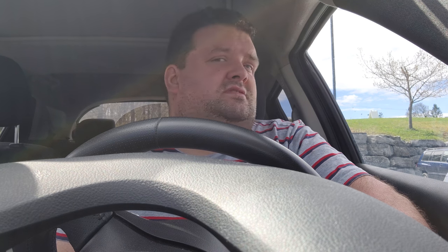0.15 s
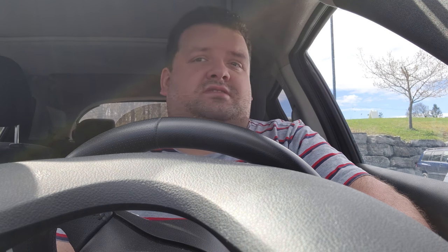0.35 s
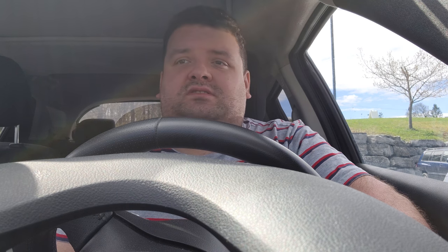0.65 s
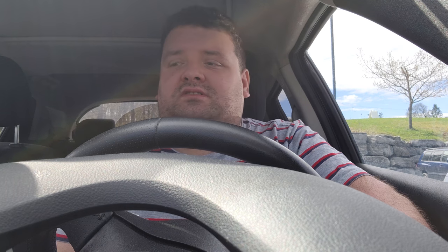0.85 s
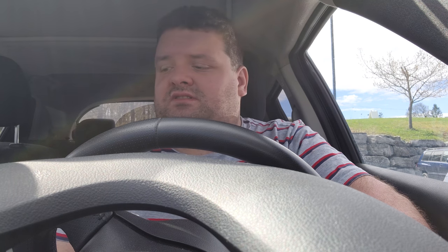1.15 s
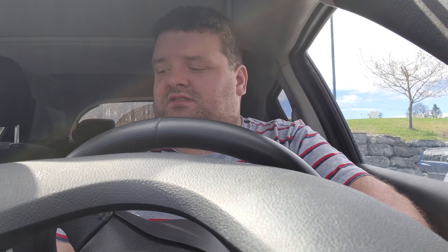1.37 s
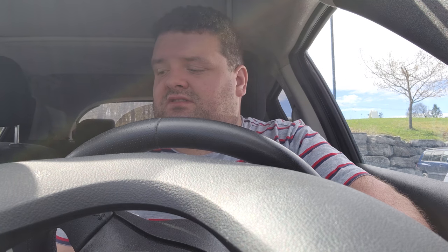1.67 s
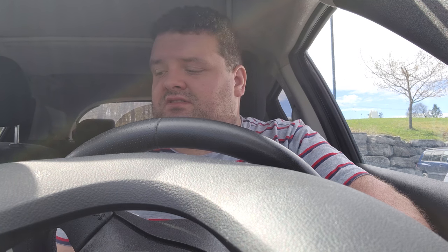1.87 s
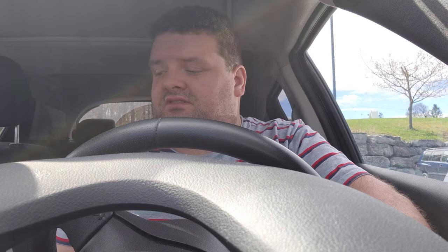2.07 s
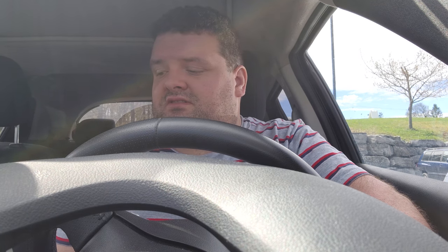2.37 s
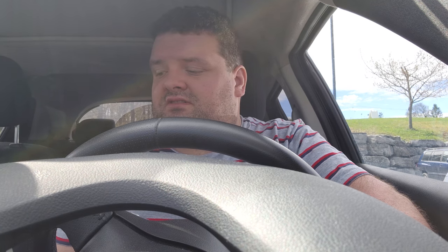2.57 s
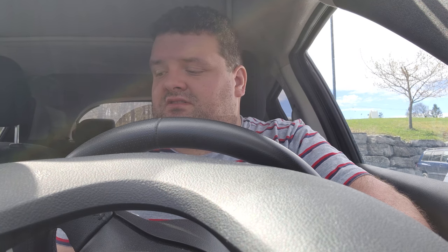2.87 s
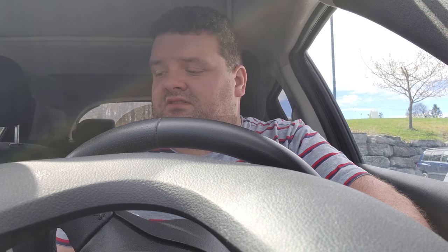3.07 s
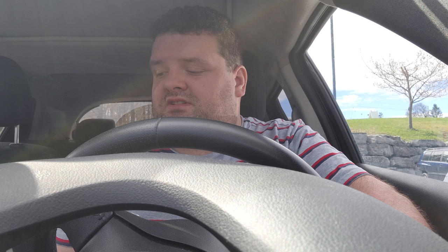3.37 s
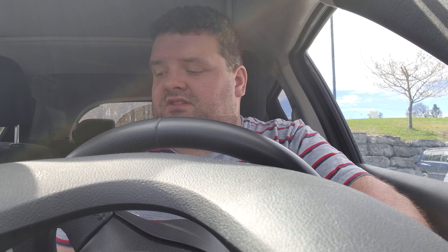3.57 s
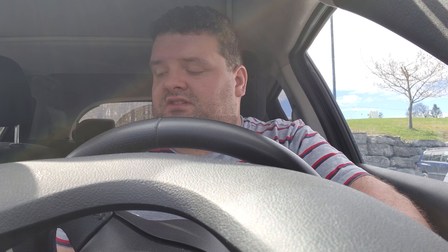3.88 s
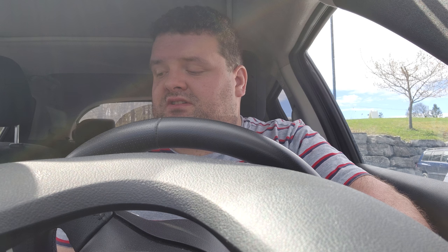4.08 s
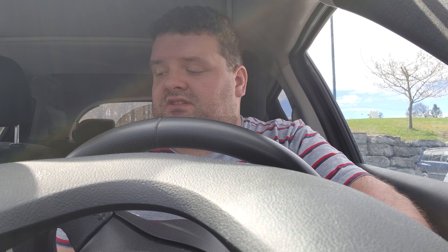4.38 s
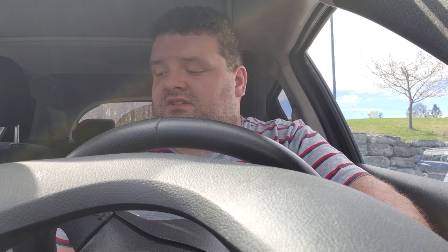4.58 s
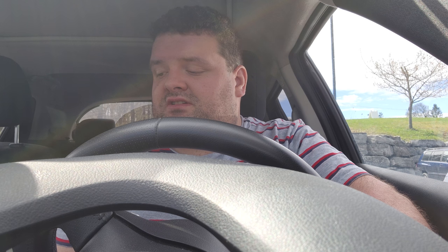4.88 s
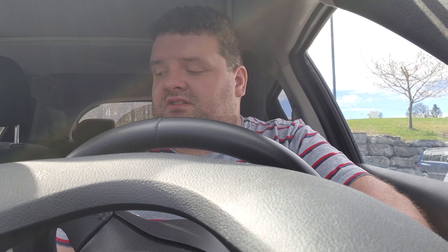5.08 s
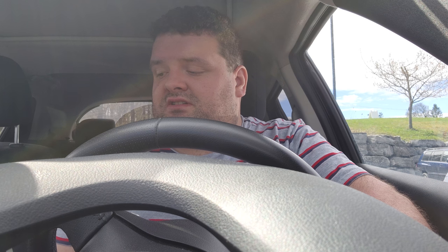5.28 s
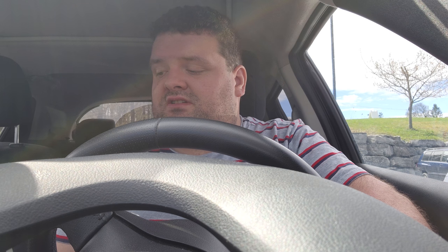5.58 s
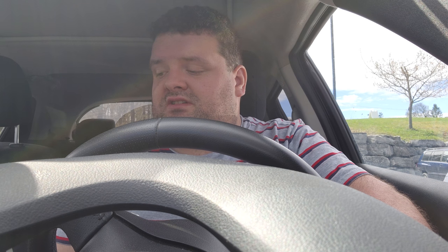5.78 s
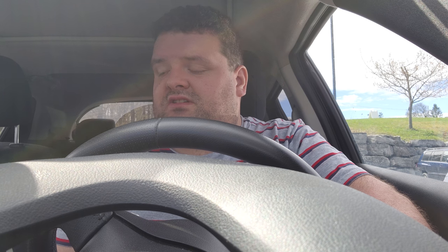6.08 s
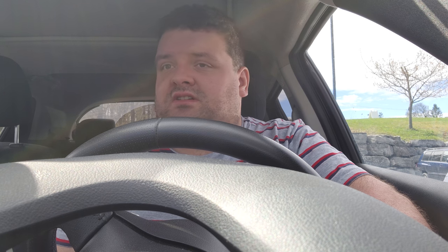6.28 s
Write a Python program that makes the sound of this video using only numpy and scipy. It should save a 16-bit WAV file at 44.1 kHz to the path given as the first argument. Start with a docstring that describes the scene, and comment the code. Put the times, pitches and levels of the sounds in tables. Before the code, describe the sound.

A steady rush of air blows from a car's vents, heard very close in the cabin, with small gusts thumping and fluttering on the microphone. Beneath it sit the low hum of the idling engine and a faint fan whine. Late on comes one short plastic click from the fan knob; the whine then sinks and the airflow grows quieter and loses its hiss.

```python
"""Air conditioning rushes from the dashboard vents of a parked car, close beside the microphone.
The air sets the dashboard's hollows humming and its draught buffets the two microphone ports.
The blower whines faintly and the engine idles. A sleeve brushes the seat and the trim squeaks.
The fan knob clicks down one step; shortly afterwards the blower slows and the rush grows soft and dull."""
import sys
import numpy as np
from scipy import signal
from scipy.fft import rfft, irfft
from scipy.io import wavfile
from scipy.ndimage import uniform_filter1d

SR = 44100
rng = np.random.default_rng(int(sys.argv[2]) if len(sys.argv) > 2 else 0)


def unload_audio(sound):
    """Save the sound as a 16-bit wav file, at the path given as the first command line argument."""
    columns = np.transpose(np.atleast_2d(sound))
    # keep every value between -1 and 1, then stretch to whole-number steps
    steps = np.round(np.clip(columns, -1, 1) * 32767)
    wavfile.write(sys.argv[1], SR, steps.astype(np.int16))


N = 284048
TIME_S = np.arange(N) / SR
BINS_HZ = np.maximum(np.arange(N // 2 + 1) * SR / N, 1)


def from_db(db):
    """Decibels to gain."""
    return 10 ** (np.asarray(db) / 20)


def over_time(rows):
    """A curve's columns at every sample."""
    times_s, *columns = np.transpose(rows)
    return [np.interp(TIME_S, times_s, column) for column in columns]


def over_frequency(rows):
    """A spectrum's columns at every bin."""
    hz, *columns = np.transpose(rows)
    return [np.interp(np.log(BINS_HZ), np.log(hz), column) for column in columns]


def white_spectrum():
    """Spectrum of fresh white noise."""
    return rfft(rng.standard_normal(N))


def noise(colour):
    """Coloured noise, rms 1."""
    x = irfft(white_spectrum() * colour, N)
    return x / np.sqrt(np.mean(x ** 2) + 1e-20)


def stereo_noise(colour, coherence):
    """Coloured noise, partly shared by the two ports."""
    shared = np.sqrt(coherence) * noise(colour)
    return shared + np.sqrt(1 - coherence) * np.array([noise(colour), noise(colour)])


def resonance(hz, half_width_hz):
    """Spectral peak of height 1."""
    return 1 / (1 + ((BINS_HZ - hz) / half_width_hz) ** 2)


def drift(rate_hz):
    """Random wander, rms 1."""
    return noise(resonance(0, rate_hz))


def swell(peak_s, length_s):
    """Smooth bump of height 1."""
    return np.exp(-(2 * (TIME_S - peak_s) / length_s) ** 2)


def tone(hz):
    """Sine on a pitch curve, rms 1."""
    return np.sqrt(2) * np.sin(2 * np.pi * np.cumsum(hz) / SR)


def pan(balance_db):
    """Constant-power gains; balance is left over right."""
    gains = from_db(np.array([[.5], [-.5]]) * balance_db)
    return gains / np.sqrt(np.mean(gains ** 2, axis=0))


def microphone_hiss(level_db):
    """The microphone's own white noise."""
    return from_db(level_db) * stereo_noise(1, coherence=.05)


# Each row: time in seconds, firing rate in Hz.
FIRING_RATE = [(0, 23.3), (1.2, 22.9), (2.0, 23.0), (2.3, 25.2), (3.0, 24.4), (3.9, 23.4), (4.3, 23.6),
               (4.6, 24.3), (5.5, 23.5), (5.9, 23.7), (6.44, 23.0)]
# Each entry: a multiple of the firing rate.
ENGINE_ORDERS = [1, 2, 5, 6]
# Each row: one order's level in dB, its share of the hum's swing.
ORDER_LEVELS = [(-56, 0), (-44.5, 0), (-47, 0.97), (-56, 1)]
# Each row: time in seconds, swing of the hum in dB.
HUM_SWING = [(0, 0.5), (2.05, 3), (2.4, -8.5), (3.35, -7.5), (3.7, 0.5), (4.4, 0), (5.0, -12), (5.35, -1.5),
             (6.44, 0)]


def engine(waver_db, rate_wander, balance_db):
    """The idle drones on multiples of the firing rate; the upper ones come and go in the cabin."""
    firing_hz = over_time(FIRING_RATE)[0] * (1 + rate_wander * drift(3))
    swing_db, = over_time(HUM_SWING)
    drone = sum(from_db(db + share * swing_db + waver_db * drift(5.1)) * tone(order * firing_hz)
                for order, (db, share) in zip(ENGINE_ORDERS, ORDER_LEVELS))
    return drone * pan(balance_db)


# Each row: time in seconds, blade-passing rate in Hz.
BLADE_RATE = [(0.2, 842), (0.8, 835), (1.5, 835.5), (2.6, 840.3), (4.1, 838.7), (5.78, 840), (5.88, 808),
              (6.0, 738), (6.1, 692), (6.2, 662), (6.44, 620)]
# Each row: time in seconds, full-speed level of the blade tone in dB.
BLADE_LEVEL = [(0, -63.5), (3.0, -64.5), (4.8, -67.5), (5.8, -65.5)]


def blower_whine(speed, jitter_hz, waver_db, db_per_speed):
    """The blade tone follows the blower's speed and wavers in the air stream."""
    level_db = over_time(BLADE_LEVEL)[0] + db_per_speed * (speed - 1) + waver_db * drift(4.4)
    return from_db(level_db) * tone(over_time(BLADE_RATE)[0] + jitter_hz * drift(21))


def blower_speed():
    """Share of full speed; falls as the blower coasts down."""
    return over_time(BLADE_RATE)[0] / BLADE_RATE[0][1]


# Each row: frequency in Hz, relative density of the rustle in dB.
CLOTH_SPECTRUM = [(300, -25), (2000, -2), (4500, 6), (7000, 2), (9000, -4), (10500, -5.5), (15000, -8)]
# Each row: peak in seconds, rise in seconds, release in seconds, level in dB.
SLEEVE_STROKES = [(.22, .4, 0.36, -84), (.69, 0.18, 0.33, -85.5), (1.5, .42, .13, -74),
                  (2.33, .65, .6, -82), (5.79, 0.13, .14, -81)]


def sleeve(grain_db, fade_db):
    """Threads slip over the seat in soft swishes; each rise and release spans fade_db."""
    envelope = sum(from_db(db - fade_db * np.maximum((peak_s - TIME_S) / rise_s,
                                                     (TIME_S - peak_s) / release_s))
                   for peak_s, rise_s, release_s, db in SLEEVE_STROKES)
    grain = from_db(grain_db * drift(300))
    return envelope * grain * stereo_noise(from_db(over_frequency(CLOTH_SPECTRUM)[0]), coherence=0.27)


# Each row: peak in seconds, length in seconds, level in dB.
TRIM_SQUEAKS = [(1.921, .012, -68.5), (1.935, .04, -72.5)]


def trim_squeaks(pitch_hz, half_width_hz):
    """Plastic trim squeaks as the arm leans on it."""
    envelope = sum(from_db(db) * swell(peak_s, length_s) for peak_s, length_s, db in TRIM_SQUEAKS)
    return envelope * stereo_noise(resonance(pitch_hz, half_width_hz), coherence=0.91)


# Each row: frequency in Hz, relative density of the scattered snap in dB.
SNAP_SPECTRUM = [(600, -15), (1400, -3), (2000, -9), (2400, -6), (3000, -5), (4300, 2.5), (5600, -3.5),
                 (6800, -8), (8200, -16), (9800, -17), (11000, -11.5), (13000, -15), (16000, -10)]
# Each row: frequency in Hz, relative level in dB, T60 in seconds.
PLASTIC_MODES = [(1497, -10, .08), (2220, -11, .07), (2310, -10, .05), (2385, -10, .05), (2982, -8.5, .07),
                 (3739, -12, .06), (4099, -5.5, .045), (4240, -6, .04), (4440, -12, .05), (4672, -9, .065),
                 (5103, -15, .06), (5371, -10, .04), (5522, -9.5, .04), (5667, -10, .04), (5981, -13, .04),
                 (6772, -16, .06), (8113, -21, .05), (10650, -17, .025), (11300, -15, .02)]
# Each row: start in seconds, gain in dB, balance in dB, low-pass cutoff in Hz, attack in seconds.
KNOB_TICKS = [(5.405, -39, 4, 5500, 0.0064), (5.4134, -33.5, 6, 10000, 0.0021),
              (5.4167, -27.5, 0.5, 11900, 0.00052), (5.4221, -33, 2.5, 14100, 0.00062),
              (5.429, -41, 2, 8000, .0006), (5.4423, -41, -3, 8000, 0.0011),
              (5.4474, -45, 0.5, 11000, 0.0011), (5.480, -45.5, -1, 4200, 0.0016),
              (5.787, -61, -2, 10500, .004), (5.855, -57, -7, 10500, 0.0027)]


def fan_knob(snap_db, snap_t60_s, tail_db, tail_t60_s, ring_db):
    """A soft lead-in, sharp clicks, then faint ticks as the finger lets go; each rings and dies away."""
    out = np.zeros((2, N))
    scatter = stereo_noise(from_db(over_frequency(SNAP_SPECTRUM)[0]), coherence=0.062)
    age_s = TIME_S[:SR // 4]
    decay = from_db(snap_db - 60 * age_s / snap_t60_s) + from_db(tail_db - 60 * age_s / tail_t60_s)
    for start_s, db, balance_db, cutoff_hz, attack_s in KNOB_TICKS:
        start = round(start_s * SR)
        span = slice(start, start + len(age_s))
        ring = sum(from_db(ring_db + mode_db - 60 * age_s / t60_s)
                   * np.sin(2 * np.pi * (hz * age_s + rng.random((2, 1))))
                   for hz, mode_db, t60_s in PLASTIC_MODES)
        tick = (scatter[:, span] * decay + ring) * np.minimum(age_s / attack_s, 1)
        lowpass = signal.butter(2, cutoff_hz, fs=SR, output="sos")
        out[:, span] += from_db(db) * pan(balance_db) * signal.sosfilt(lowpass, tick)
    return out


# Each row: frequency in Hz, half-width in Hz, full-speed level in dB.
HOLLOW_MODES = [(144, 5, -57.5), (336, 15, -59.5), (453.7, 16, -59.5), (1175.4, 13, -70.5),
                (1420, 16, -75.5), (1557, 26, -69), (4075, 130, -83.5), (5780, 96, -92),
                (8100, 120, -105.5)]


def dashboard_hollows(speed, db_per_speed):
    """The air stream sets cavities and grille slats humming, alike at both ports."""
    hum = sum(from_db(db) * noise(resonance(hz, half_width_hz)) for hz, half_width_hz, db in HOLLOW_MODES)
    return hum * from_db(db_per_speed * (speed - 1))


# Each row: centre in seconds, length in seconds, depth in dB.
JET_LULLS = [(0.61, 0.076, -3), (1.56, 0.11, -7.5), (2.382, .22, -1), (3.324, 0.091, -3.5),
             (4.132, 0.19, -7), (4.556, 0.036, -6.5), (4.888, 0.1, -12), (5.395, 0.026, -16)]


def lulls_db():
    """The level dips when the jet swings away from the microphone."""
    return sum(depth_db * swell(centre_s, length_s) for centre_s, length_s, depth_db in JET_LULLS)


# Each row: frequency in Hz, relative density of the rumble in dB.
BUFFET_SPECTRUM = [(18, -22.5), (30, -15), (45, -3), (62, 2.5), (85, 0.5), (125, -7.5), (170, -14.5),
                   (400, -32.5), (1000, -75.5), (4000, -115)]
# Each row: peak in seconds, length in seconds, level in dB, balance in dB, flutter over thump in dB.
PORT_GUSTS = [(0.465, 0.079, -35.5, -8, -2), (0.715, 0.074, -38.5, 12, 2.5), (0.978, 0.034, -38.5, -5, 2),
              (1.226, 0.13, -41, -6, 4), (1.413, 0.091, -30, -1, -12.5), (1.77, 0.075, -40, -6, 1.5),
              (1.989, 0.053, -32, -5.5, -3), (2.153, 0.057, -34.5, -16.5, -2),
              (2.842, 0.2, -35.5, -7.5, -12), (3.502, 0.048, -33, 3.5, -16), (3.775, 0.079, -35, -7, -3),
              (3.902, 0.049, -32.5, -13.5, -2), (4.031, 0.064, -35.5, 1, 1), (4.75, 0.035, -30.5, 1.5, -6),
              (4.856, 0.027, -32, 1, -12.5), (5.341, 0.038, -26.5, -1, -10.5), (5.449, 0.04, -32.5, 4, 2.5),
              (5.994, 0.26, -39.5, -12.5, -6), (6.195, 0.035, -35.5, -6, -9.5)]


def buffeting(draught_db, wander_db, lean_db, sway_db, wander_hz, flutter_db, coherence):
    """Draught and gusts press on the ports: big lumps of air thump, small ones flutter."""
    draught = from_db(draught_db + lulls_db() + wander_db * drift(wander_hz))
    draught = draught * pan(lean_db + sway_db * drift(wander_hz))
    thump_power = draught ** 2
    flutter_power = (from_db(flutter_db) * draught) ** 2
    for peak_s, length_s, db, balance_db, gust_flutter_db in PORT_GUSTS:
        gust_power = (from_db(db) * pan(balance_db)) ** 2 * swell(peak_s, length_s)
        thump_power += gust_power
        flutter_power += gust_power * from_db(gust_flutter_db) ** 2
    colour = from_db(over_frequency(BUFFET_SPECTRUM)[0])
    thump_share = 1 / (1 + (BINS_HZ / 78) ** 12)
    thumps = stereo_noise(colour * np.sqrt(thump_share), coherence)
    thumps /= np.sqrt(uniform_filter1d(thumps.mean(axis=0) ** 2, size=2200))  # levelled over 50 ms
    flutter = stereo_noise(colour * np.sqrt(1 - thump_share), coherence)
    return thumps * np.sqrt(thump_power) + flutter * np.sqrt(flutter_power)


def cabin_response(wet, t60_s):
    """Spectrum of direct sound plus a short wash of reflections."""
    wash = rng.standard_normal(N) * from_db(-60 * np.minimum(TIME_S / t60_s, 4))
    return 1 + wet * rfft(wash) / np.sqrt(np.sum(wash ** 2)) * BINS_HZ / (BINS_HZ + 500)


# Each row: frequency in Hz, relative density of the rush in dB.
RUSH_SPECTRUM = [(100, -9), (200, -1), (290, 1), (345, -1.5), (390, -6), (450, -3), (560, -7), (760, -10.5),
                 (875, -12.5), (935, -13.5), (1015, -11), (1200, -16), (1420, -13.5), (1540, -15),
                 (1680, -11.5), (1830, -18.5), (2080, -27), (2330, -25), (2560, -29), (2950, -28),
                 (3400, -33.5), (4050, -40), (4500, -43.5), (5800, -44), (7100, -53.5), (7600, -60),
                 (9000, -63)]
# Each row: frequency in Hz, coherence from 0 to 1, phase from reflections in radians, balance in dB.
RUSH_IMAGE = [(160, .7, .37, .1), (335, .95, .43, 1.8), (395, .27, -.4, -1), (470, .8, .7, -1.5),
              (510, .55, .5, 1.7), (560, .25, -.3, -2.5), (620, .87, 1, -2.5), (760, .63, .2, 2),
              (950, .94, -.62, -1), (1170, .55, -.3, -4.5), (1300, .75, .1, -6), (1480, .72, .6, -8),
              (1550, .5, 2.3, -2), (1620, .82, 1.3, 3.4), (1760, .8, .8, .3), (2130, .5, -.7, 1.5),
              (2300, .8, -.45, 2.5), (2530, .35, -.8, 3), (2780, .7, .3, 3.8), (3150, .4, .3, 4.3),
              (3450, .12, -2.5, 1.5), (4300, .15, -3.5, -3), (5100, .45, -1.6, .5), (5600, .15, -1.2, -2.7),
              (5900, .5, 0, -.5), (6500, .1, -1, -2.5), (7900, .25, 1.5, 5), (9300, .1, 2.5, -2)]


def grille_spectrum(top_db_per_octave, port_lag_s):
    """Steady air noise from the grilles; it reaches the right port first and scatters in the cabin."""
    bottom_hz, top_hz = RUSH_SPECTRUM[0][0], RUSH_SPECTRUM[-1][0]
    rolloff_db = top_db_per_octave * np.log2(np.maximum(BINS_HZ / top_hz, 1))
    colour = from_db(over_frequency(RUSH_SPECTRUM)[0] + rolloff_db)
    colour /= np.sqrt(1 + (bottom_hz / BINS_HZ) ** 6)
    coherence, phase_rad, balance_db = over_frequency(RUSH_IMAGE)
    port_phase = np.exp(1j * np.array([[.5], [-.5]]) * (phase_rad - 2 * np.pi * BINS_HZ * port_lag_s))
    direct = white_spectrum() * port_phase * cabin_response(wet=0.23, t60_s=0.089)
    scattered = np.array([white_spectrum() * cabin_response(wet=0.56, t60_s=0.073) for port in range(2)])
    air = (np.sqrt(coherence) * direct + np.sqrt(1 - coherence) * scattered) * colour * pan(balance_db)
    return air / irfft(air, N).std()


# Each row: peak in seconds, length in seconds, rise of the low roar in dB.
JET_EDDIES = [(0.432, 0.28, 5.5), (0.702, .15, 1.5), (0.958, .12, 3), (1.209, .16, 7), (1.36, .09, 6),
              (1.85, .3, 3), (2.199, .07, 9.5), (2.703, .12, 2.5), (2.897, 0.23, 3.5), (3.953, 0.21, 4.5),
              (4.732, .1, 2.5), (5.164, 0.23, 6), (5.436, 0.066, 5), (5.691, 0.049, 9), (5.888, 0.11, 4)]


def vents(speed, level_db, roar_db_per_speed, hiss_db_per_speed, wander_db, lull_share, flutter_db):
    """Air rushes through the grilles; eddies swell its low roar, and a slower fan loses its hiss first."""
    air = grille_spectrum(top_db_per_octave=-16, port_lag_s=.000408)
    eddies_db = sum(rise_db * swell(peak_s, length_s) for peak_s, length_s, rise_db in JET_EDDIES)
    roar_db = eddies_db - eddies_db.mean() + lull_share * lulls_db() + wander_db * drift(6.6)
    octave = np.clip(np.log2(BINS_HZ / 250), 0, 4)
    out = 0
    for index, treble in enumerate(np.linspace(0, 1, 5)):  # bands from roar to hiss
        band = irfft(air * np.maximum(1 - abs(octave - index), 0), N)
        slowing_db = (speed - 1) * (roar_db_per_speed * (1 - treble) + hiss_db_per_speed * treble)
        swell_db = roar_db * (1 - treble) ** 4 + flutter_db * (1 - .6 * treble) * drift(14)
        out = out + band * from_db(slowing_db + swell_db)
    return from_db(level_db) * out


def scene():
    """Air, motors and hand sounds over faint hiss."""
    speed = blower_speed()
    air = vents(speed, level_db=-42.5, roar_db_per_speed=8.5, hiss_db_per_speed=51,
                wander_db=1.02, lull_share=0.82, flutter_db=1.5)
    air += dashboard_hollows(speed, db_per_speed=50.5)
    air += buffeting(draught_db=-39, wander_db=2.0, lean_db=5.5, sway_db=4, wander_hz=5.6,
                     flutter_db=-3.0, coherence=0.74)
    whine = blower_whine(speed, jitter_hz=.7, waver_db=1.36, db_per_speed=5)
    idle = engine(waver_db=3.0, rate_wander=.005, balance_db=2.5)
    hand = sleeve(grain_db=0.5, fade_db=13.5) + trim_squeaks(pitch_hz=3280, half_width_hz=110)
    hand += fan_knob(snap_db=-1.0, snap_t60_s=0.016, tail_db=-19.5, tail_t60_s=0.11, ring_db=-4.5)
    return air + whine + idle + hand + microphone_hiss(level_db=-93.5)


def record(dry):
    """3 ms fade-in, steep low-pass at 15750 Hz."""
    lowpass = signal.ellip(12, .1, 80, 15750, fs=SR, output="sos")
    return signal.sosfilt(lowpass, dry * np.minimum(TIME_S / .003, 1))


dry = scene()
out = record(dry)
unload_audio(out)
```